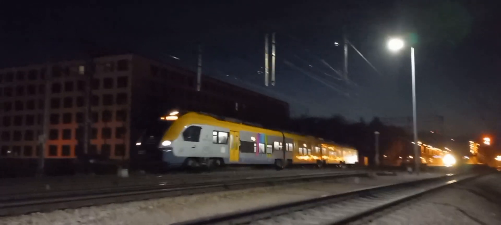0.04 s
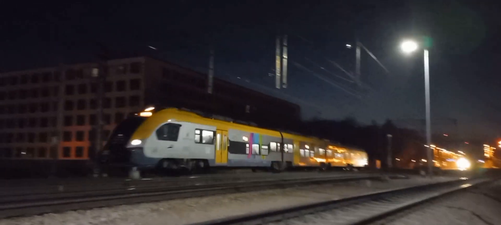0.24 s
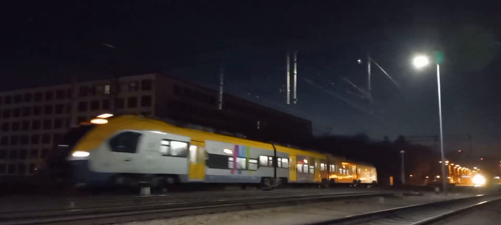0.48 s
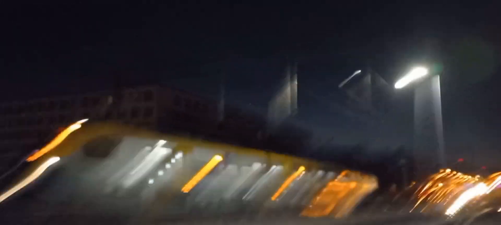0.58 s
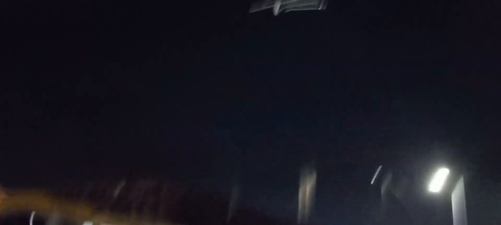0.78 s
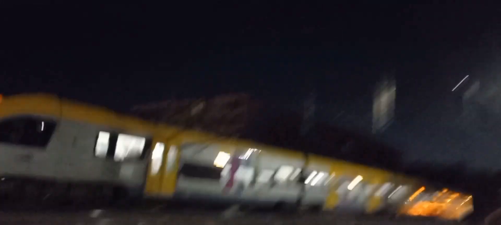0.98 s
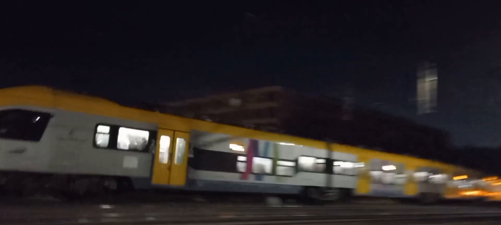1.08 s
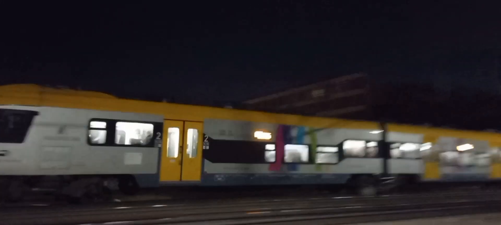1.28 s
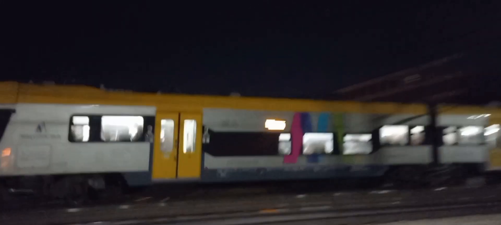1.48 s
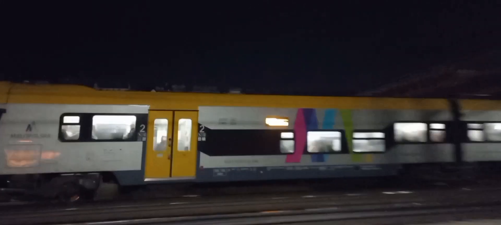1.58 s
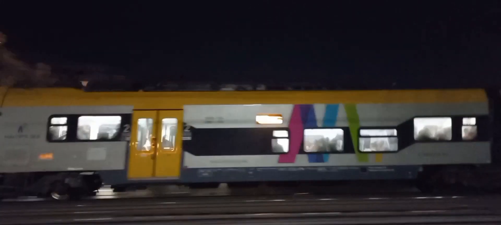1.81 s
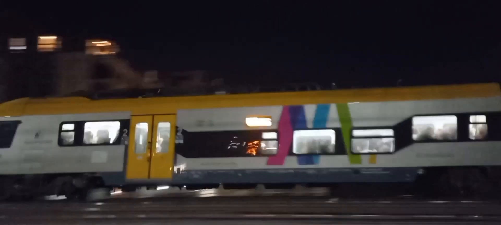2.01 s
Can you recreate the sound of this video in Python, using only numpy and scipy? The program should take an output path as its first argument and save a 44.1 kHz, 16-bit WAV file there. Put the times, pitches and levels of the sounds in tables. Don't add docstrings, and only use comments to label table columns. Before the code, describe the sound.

An electric train rumbles closer outdoors at night; air hisses, then a very loud two-tone horn blares once, stuttering at its start and end. Echoes ring on over rolling wheels, captured by a close handheld stereo microphone.

```python
import sys
import numpy as np
from scipy import signal
from scipy.fft import rfft, irfft
from scipy.io import wavfile
from scipy.ndimage import uniform_filter1d

SR = 44100
rng = np.random.default_rng(int(sys.argv[2]) if len(sys.argv) > 2 else 0)


def persist_wave(psi):
    counts = np.round(np.clip(psi, -1, 1) * 32767).astype(np.int16)
    wavfile.write(sys.argv[1], SR, np.atleast_2d(counts).T)


def voltage_ratio(decibels):
    exponent = np.asarray(decibels, float) / 20
    return 10 ** exponent


N = 90404

# time_s, gain_db
DUCK_GAIN = [
    (0, -3.5),
    (.2, -2.5),
    (.42, -0.5),
    (.49, -2.5),
    (.535, -28),
    (1.0, -18.5),
    (1.15, -20),
    (1.35, -18),
    (2.05, -15),
]
# centre_hz, width_hz, level_db
BOGIE_BOOM = [(189, 22, -33.5), (237.3, 77, -30), (135.7, 28, -48.5)]
# centre_hz, width_hz, level_db
RAIL_SINGING = [(1932, 170, -43), (2378, 68, -43)]
# freq_hz, level_db
ROLL_SPECTRUM = [(300, -21), (433, -6), (1160, -12), (2470, -16), (6500, -21.5), (7900, -41.5),
                 (12000, -39), (16400, -42)]
# freq_hz, level_db
WIND_SPECTRUM = [(20, -40), (35, -52), (60, -32), (90, -23), (120, -32), (200, -11), (330, -26)]
ROLL_DB, WIND_DB = -33.5, -37
ROLL_DUCK_SHARE, WIND_DUCK_SHARE = 0.65, 0.61
# start_s, length_s, pitch_hz, level_db
SLEEPER_THUMPS = [(.03, 0.032, 197.6, -26.5), (.1, .06, 214, -33), (.2, 0.058, 201.6, -22.5),
                  (.25, 0.038, 240.3, -25.5), (.34, 0.077, 191, -32), (.375, 0.052, 200, -19.5),
                  (.44, 0.069, 255.7, -27), (.54, 0.043, 184, -40), (1.45, .07, 193, -40),
                  (1.69, 0.073, 231, -42), (1.87, 0.047, 227, -36)]

# time_s, level_db
VALVE_FLOW = [
    (0.17, -62),
    (0.192, -73),
    (0.204, -37),
    (0.462, -34.5),
    (0.53, -38),
    (0.604, -30.5),
    (0.95, -35.5),
    (1.208, -57),
    (1.3, -63.5),
]
# freq_hz, level_db
HISS_SPECTRUM = [(880, -40), (1500, -28.5), (2420, -4.5), (2700, -10.5), (5130, -8.5), (7880, -17.5),
                 (14900, -17.5), (16300, -25)]
# start_s, length_s, level_db
AIR_PUFFS = [(0.03, 0.0072, -44), (0.037, 0.0042, -49), (0.064, 0.0034, -47), (0.0706, .004, -47),
             (0.088, .004, -40), (0.0955, 0.037, -44.5), (.139, .004, -48), (0.17, 0.01, -38),
             (1.308, 0.024, -53), (1.3825, 0.045, -56), (1.503, 0.074, -55), (1.672, 0.022, -55),
             (1.935, 0.054, -46.5)]
# freq_hz, level_db
PUFF_SPECTRUM = [(2940, -44), (5000, -4), (6400, -2.5), (7850, -23), (9500, -15), (13000, -10),
                 (16300, -19)]
HISS_DB, HISS_DUCK_SHARE = 8, 0.095

# time_s, pitch_hz
LOW_PITCH = [(.45, 364), (.47, 377), (.49, 384), (.53, 390), (.6, 388), (.75, 385), (.9, 382.5),
             (1.02, 380.5), (1.1, 378)]
# start_s, length_s, start_db, end_db
LOW_BURSTS = [
    (0.454, 0.0069, -25, -14),
    (0.462, 0.0288, -8.5, -22.5),
    (0.491, 0.007, -13, -8),
    (0.498, .524, -18.5, -16.5),
    (1.04, 0.02, -15, -15),
    (1.077, 0.0296, -17, -20.5),
]
# multiple, level_db
LOW_HARMONICS = [(1, -4.5), (2, -5.5), (3, -5.5), (4, -4), (5, -16), (6, -16.5), (7, -16.5), (8, -16.5),
                 (9, -20), (10, -23), (11, -21), (12, -28.5), (13, -21.5), (14, -22.5), (15, -16),
                 (16, -17), (17, -22), (18, -25), (19, -27), (20, -53)]
# time_s, pitch_hz, level_db
HIGH_HORN = [
    (.524, 676, -25),
    (.537, 669.7, -10.5),
    (.552, 700.6, -10.5),
    (.64, 683.7, -12),
    (.8, 676.8, -13),
    (.97, 674.8, -13.5),
    (1.06, 694, -16.5),
    (1.145, 707, -21.5),
    (1.19, 686, -42),
]
# multiple, level_db
HIGH_HARMONICS = [(1, 0), (2, -3.5), (3, -9.5), (4, -12), (5, -16), (6, -11), (7, -15.5), (8, -14),
                  (9, -17.5), (10, -18.5), (11, -26.5), (12, -48), (13, -40.5), (14, -30), (15, -29),
                  (16, -25.5), (17, -26), (18, -25.5), (19, -28), (20, -33), (21, -33), (22, -31),
                  (23, -40)]
# freq_hz, gain_db
LOW_ONSET = [(390, 1), (770, 4), (1160, -8.5), (1950, 7), (3000, -1.5), (4200, -2.5), (6200, -2.5)]
# freq_hz, gain_db
HIGH_ONSET = [(690, -0.5), (2100, -0.5), (2800, 2.5), (4100, -5), (5500, -3.5), (6500, -5.5),
              (10000, -10.5)]
# freq_hz, gain_db
LATE_COLOUR = [(390, -2), (700, 1.5), (1150, 7.5), (1400, 7), (2000, 1.5), (2700, -8.5), (4100, -9),
               (8000, -7.5)]
# freq_hz, level_db
RASP_SPECTRUM = [(300, 3.5), (640, 6.5), (950, -6), (2500, 3), (3000, -16), (6500, -2), (8000, -27),
                 (16400, -30)]
# time_s, shift_rad_per_khz
PORT_SWING = [(.45, -0.58), (.57, -0.77), (.65, -0.12), (.8, 0.012), (.88, -0.23), (1.1, -0.14)]
RISE_S, FALL_S, SETTLE_S = 0.0047, 0.0048, 0.15
LATE_FROM_S, LATE_SPAN_S = 0.82, 0.41
WOBBLE_DB, WOBBLE_DB_PER_KHZ, WOBBLE_TOP_DB, WOBBLE_PER_S = 0.2, 0.6, 2, 24
SWAY_RAD_PER_KHZ = 0.08
PITCH_JITTER, RASP_DB, RASP_PATCH_DB = 0.0012, -29, 2
SLACK_DULLS = 0.8
PHASE_SPREAD_RAD = 0.45

# low_pitch_hz, delay_s, level_db, t60_s
WALL_ECHOES = [
    (391.1, .12, -24.5, 2.84),
    (367.4, .1, -29, 2.7),
    (380.1, .16, -30.5, 1.5),
    (410.7, .02, -32.5, 0.18),
    (353.8, .05, -35, 0.23),
]
# freq_hz, gain_db
ECHO_COLOUR = [(300, -4.5), (700, -5.5), (1400, -3.5), (2200, 2), (3500, 1), (4200, -0.5), (5500, 7),
               (8000, -6)]
# freq_hz, t60_share
ECHO_DECAY = [(300, 1), (2000, 1), (4200, .45), (10000, .25)]
ECHO_DUCK_SHARE = 0.92
FLUTTER_DB, FLUTTER_PER_S = 1.5, 60
ECHO_WAVER_S, ECHO_WAVER_PER_S = 0.00025, 14

# start_s, centre_hz, level_db, t60_s
DIAPHRAGM_POP = (.4945, 1100, -18, .016)
# start_s, centre_hz, level_db, t60_s
JOINT_CLACK = (1.705, 450, -41, .1)

# freq_hz, correlation
PORT_LIKENESS = [(60, .97), (250, .97), (400, .7), (1400, .45), (2300, .75), (5000, .3), (15000, .2)]
# freq_hz, phase_rad
PORT_LEAD = [(200, .1), (680, 1), (1540, 3.2), (1950, 7.4), (2400, 7.7), (2720, 9.3), (4100, 12.4),
             (7000, 16.5)]
# freq_hz, level_db
PORT_LEAN = [(60, -3), (390, 4), (680, -1.5), (1150, 4.5), (2000, 2), (2700, 1), (6000, -1), (9000, 7.5)]
PEAK_CEILING, BASS_CUT_HZ = 1.1, 48
MIC_BEND = 0.03


def evened(x):
    return x / np.sqrt(np.mean(x ** 2) + 1e-20)


def read(points, hz):
    f, value = np.transpose(points)
    return np.interp(np.log(hz + 1), np.log(f + 1), value)


def curve(rows, col=1):
    rows = np.array(rows)
    return np.interp(np.arange(N) / SR, rows[:, 0], rows[:, col])


def gate(start_s, length_s, rise_s, fall_s):
    t = np.arange(N) / SR - start_s
    attack = np.clip(t / rise_s, 0, 1)
    release = np.clip((length_s + fall_s - t) / fall_s, 0, 1)
    return attack * release


def slow(per_s, count):
    steps = rng.standard_normal((count, 400))
    at = np.arange(N) / SR * per_s
    return np.array([np.interp(at, np.arange(400), s) for s in steps]) * 1.495


def noise(spectrum, patchy_db, like=1):
    frames = N // 128 + 5
    hz = np.fft.rfftfreq(1024, 1 / SR)
    a, b, c, d, patches = rng.standard_normal((frames, 513, 5)).T
    patches = uniform_filter1d(patches, size=12, axis=0)
    patches = evened(uniform_filter1d(patches, size=16, axis=1))
    same = np.clip(like * read(PORT_LIKENESS, hz), -1, 1)[:, None]
    left = a + 1j * b
    right = same * left + np.sqrt(1 - same ** 2) * (c + 1j * d)
    inside = (hz >= spectrum[0][0]) & (hz <= spectrum[-1][0])
    gain = voltage_ratio(read(spectrum, hz)[:, None] + patchy_db * patches) * inside[:, None]
    z = np.array([left, right]) * gain
    return evened(signal.istft(z, nperseg=1024, noverlap=896)[1][:, :N])


def band(hz, width_hz, own):
    x = rng.standard_normal((4, N))
    shared = x[0] + 1j * x[1]
    z = np.array([shared, shared + own * (x[2] + 1j * x[3])])
    r = np.exp(-np.pi * width_hz / SR)
    for _ in range(2):
        z = signal.lfilter([1], [1, -r], z)
    carrier = np.exp(2j * np.pi * hz * np.arange(N) / SR)
    return evened((z * carrier).real)


def train():
    duck_db = curve(DUCK_GAIN)
    boom = sum(voltage_ratio(db) * band(hz, w, 0.073) for hz, w, db in BOGIE_BOOM)
    sing = sum(voltage_ratio(db) * band(hz, w, 0.99) for hz, w, db in RAIL_SINGING)
    roll = voltage_ratio(ROLL_DB) * noise(ROLL_SPECTRUM, patchy_db=0.0) + sing
    wind = voltage_ratio(WIND_DB) * noise(WIND_SPECTRUM, patchy_db=-3.0, like=0.87)
    return voltage_ratio(duck_db) * boom + voltage_ratio(ROLL_DUCK_SHARE * duck_db) * roll + voltage_ratio(WIND_DUCK_SHARE * duck_db) * wind


def thumps():
    t = np.arange(N) / SR
    out = np.zeros(N)
    for s, d, hz, db in SLEEPER_THUMPS:
        swell = np.sin(np.pi * np.clip((t - s) / d, 0, 1)) ** 2
        out += voltage_ratio(db) * swell * np.sqrt(2) * np.sin(2 * np.pi * hz * (t - s))
    return out


def air():
    flow_db = curve(VALVE_FLOW) + HISS_DB + HISS_DUCK_SHARE * curve(DUCK_GAIN)
    opening = gate(VALVE_FLOW[0][0], 1.18, 0.0087, 0.22)
    hiss = voltage_ratio(flow_db) * opening * noise(HISS_SPECTRUM, patchy_db=2.5)
    puffs = sum(voltage_ratio(db) * gate(s, 0.5 * d, 0.001, d + 0.014) for s, d, db in AIR_PUFFS)
    return hiss + puffs * noise(PUFF_SPECTRUM, patchy_db=-5.0)


def horn(pitch_hz, level, slack_db, harmonics, onset, start_s):
    t = np.arange(N) / SR
    turns = np.cumsum(pitch_hz * (1 + PITCH_JITTER * slow(150, count=1)[0])) / SR
    early = np.clip(1.3 - (t - start_s) / SETTLE_S, 0, 1)
    late = np.clip((t - LATE_FROM_S) / LATE_SPAN_S, 0, 1.4)
    swing = curve(PORT_SWING)
    tone = np.zeros((2, N))
    for k, db in harmonics:
        khz = k * pitch_hz.mean() / 1000
        both, left, right, skew = slow(WOBBLE_PER_S, count=4)
        depth_db = np.minimum(WOBBLE_DB + WOBBLE_DB_PER_KHZ * khz, WOBBLE_TOP_DB)
        wobble_db = depth_db * (both + 0.79 * np.array([left, right]))
        colour_db = early * read(onset, 1000 * khz) + late * read(LATE_COLOUR, 1000 * khz)
        dulling_db = SLACK_DULLS * slack_db * np.log2(k)
        port_phase = khz * np.outer([0.5, -0.5], SWAY_RAD_PER_KHZ * skew + swing)
        phase = 2 * np.pi * k * turns - PHASE_SPREAD_RAD * k * k + port_phase
        tone += voltage_ratio(db + wobble_db + colour_db - dulling_db) * np.cos(phase)
    tone_rms = np.sqrt(np.sum(voltage_ratio(np.array(harmonics)[:, 1]) ** 2) / 2)
    rasp = noise(RASP_SPECTRUM, RASP_PATCH_DB) * (1 + np.cos(2 * np.pi * turns))
    return level * (tone / tone_rms + voltage_ratio(RASP_DB) * rasp)


def low_horn():
    t = np.arange(N) / SR
    level, slack_db = np.zeros(N), np.zeros(N)
    for s, d, start_db, end_db in LOW_BURSTS:
        db = start_db + (end_db - start_db) * np.clip((t - s) / d, 0, 1)
        on = gate(s, d, RISE_S, FALL_S)
        level += on * voltage_ratio(db)
        slack_db += (on > 0) * np.maximum(start_db - db, 0)
    slack_db = uniform_filter1d(slack_db, size=150)
    return horn(curve(LOW_PITCH), level, slack_db, LOW_HARMONICS, LOW_ONSET, 0.55)


def high_horn():
    level_db = curve(HIGH_HORN, col=2)
    start_s, end_s = HIGH_HORN[0][0], HIGH_HORN[-1][0]
    level = voltage_ratio(level_db) * gate(start_s, end_s - start_s, 0.0026, 0.0043)
    slack_db = 0.44 * (level_db.max() - level_db)
    return horn(curve(HIGH_HORN), level, slack_db, HIGH_HARMONICS, HIGH_ONSET, 0.56)


def echoes(blast):
    t = np.arange(N) / SR
    start_s = LOW_BURSTS[0][0]
    turns = np.cumsum(curve(LOW_PITCH)) / SR
    turns = turns - turns[round(start_s * SR)]
    out = np.zeros((2, N))
    for low_hz, delay_s, db, t60_s in WALL_ECHOES:
        drift = uniform_filter1d(slow(ECHO_WAVER_PER_S, count=1)[0], size=2000)
        path_s = t - start_s - delay_s + ECHO_WAVER_S * drift
        moved = np.interp(path_s * low_hz, turns, blast)
        a, b = rng.standard_normal((2, N))
        hz, frame_s, z = signal.stft(np.array([a, a + b]), SR, nperseg=256)
        decay_db = 60 * frame_s / (t60_s * read(ECHO_DECAY, hz)[:, None])
        z = z * voltage_ratio(read(ECHO_COLOUR, hz)[:, None] - decay_db)
        tail = signal.istft(z, SR, nperseg=256)[1][:, :N]
        tail = tail / np.linalg.norm(tail[0])
        smeared = signal.fftconvolve(moved[None], tail, axes=1)[:, :N]
        out += voltage_ratio(db + FLUTTER_DB * slow(FLUTTER_PER_S, count=1)) * smeared
    return out


def knock(start_s, hz, db, t60_s, width_hz):
    t = np.maximum(np.arange(N) / SR - start_s, 0)
    envelope = voltage_ratio(db - 60 * t / t60_s) * np.minimum(t / 0.00063, 1)
    return envelope * band(hz, width_hz, 0.3)


def scene():
    blast = low_horn() + high_horn()
    duck_db = curve(DUCK_GAIN)
    walls = voltage_ratio(ECHO_DUCK_SHARE * (duck_db - duck_db.min())) * echoes(blast.mean(0))
    knocks = knock(*DIAPHRAGM_POP, width_hz=1600) + knock(*JOINT_CLACK, width_hz=500)
    return train() + thumps() + air() + blast + walls + knocks


def band_limit(x):
    return signal.sosfilt(signal.butter(12, 15780, fs=SR, output="sos"), x)


def record(dry):
    hz = np.fft.rfftfreq(N, 1 / SR)
    half = voltage_ratio(read(PORT_LEAN, hz) / 2) * np.exp(0.5j * read(PORT_LEAD, hz))
    bass_cut = 1 / np.sqrt(1 + (BASS_CUT_HZ / (hz + 1)) ** 6)
    ports = irfft(rfft(dry) * np.array([half, 1 / half]) * bass_cut, N)
    soft = ports / (1 + (ports / PEAK_CEILING) ** 4) ** 0.25
    squared = soft ** 2
    mix = soft + MIC_BEND * (squared - uniform_filter1d(squared, size=300, axis=1))
    return band_limit(mix)


dry = scene()
out = record(dry)
persist_wave(out)
```